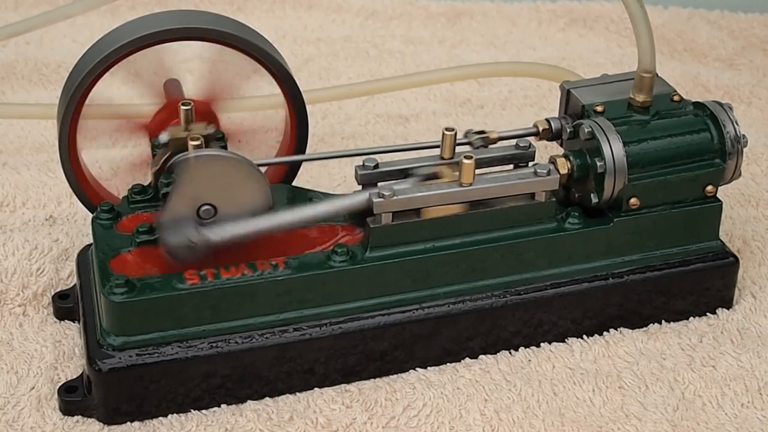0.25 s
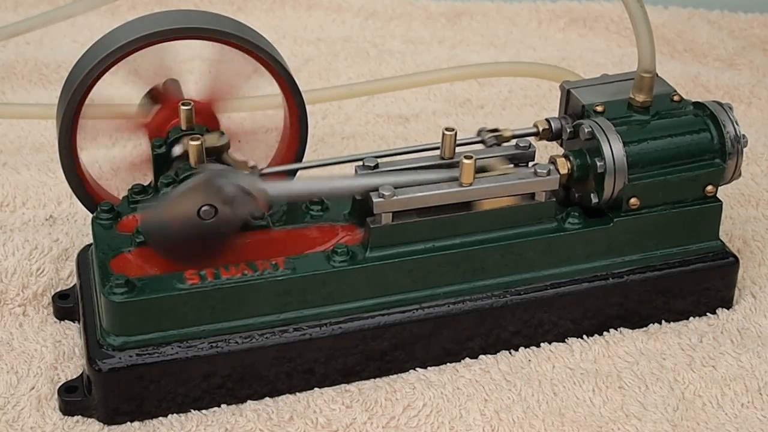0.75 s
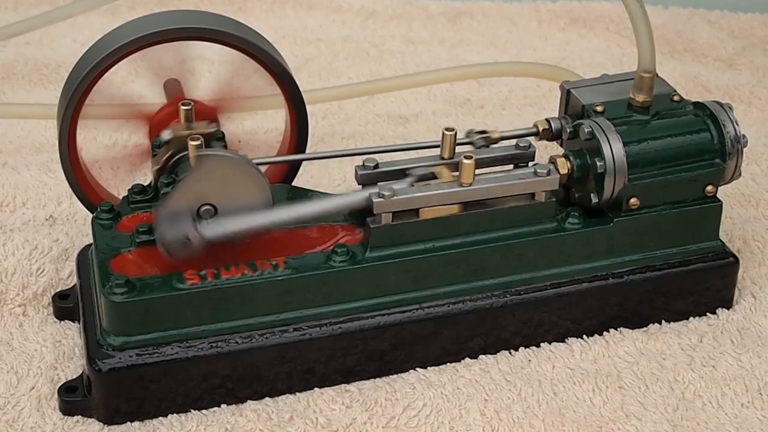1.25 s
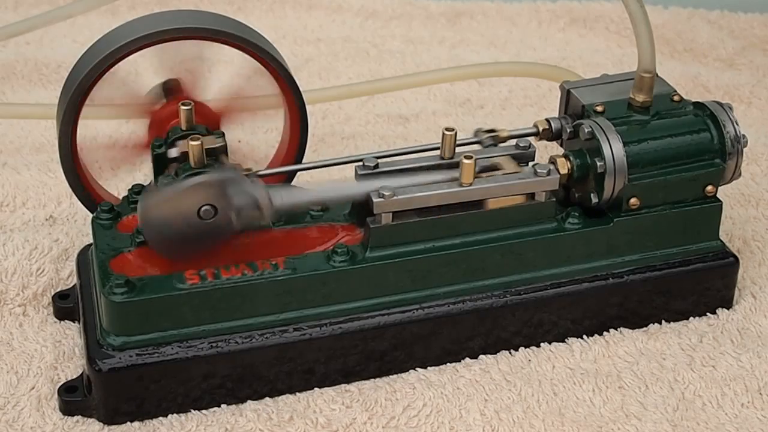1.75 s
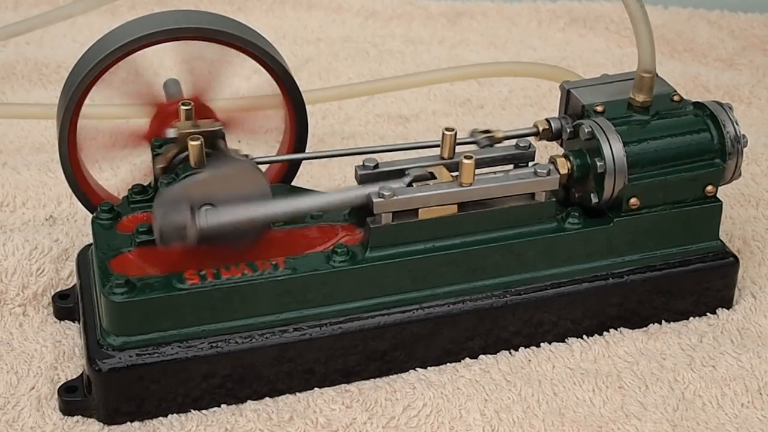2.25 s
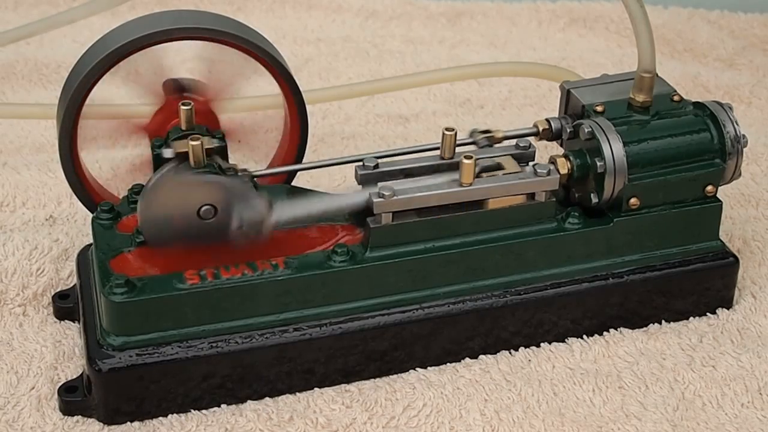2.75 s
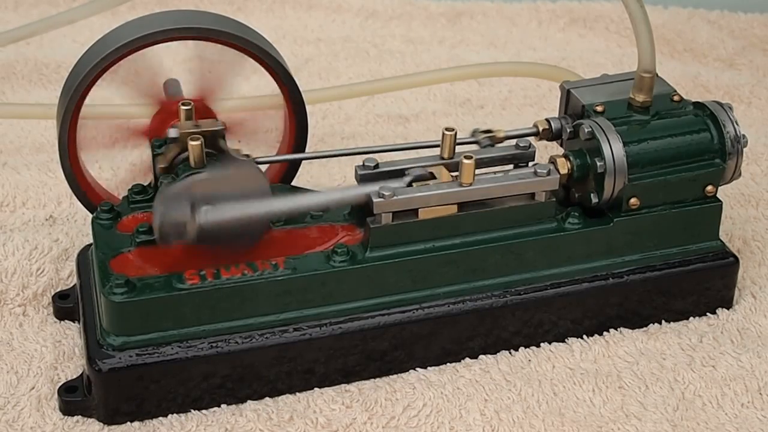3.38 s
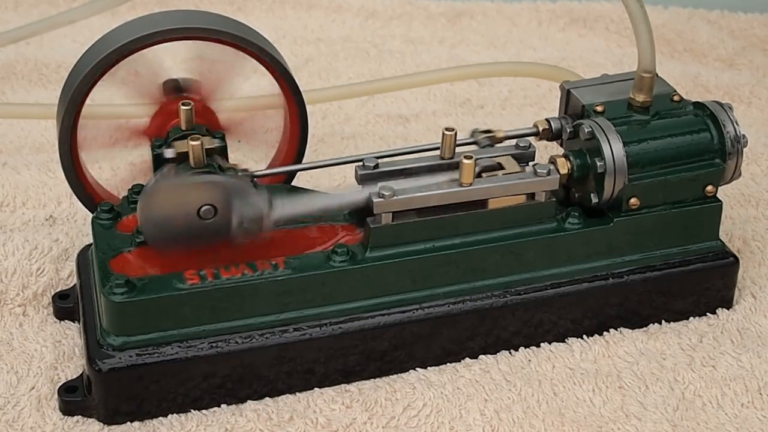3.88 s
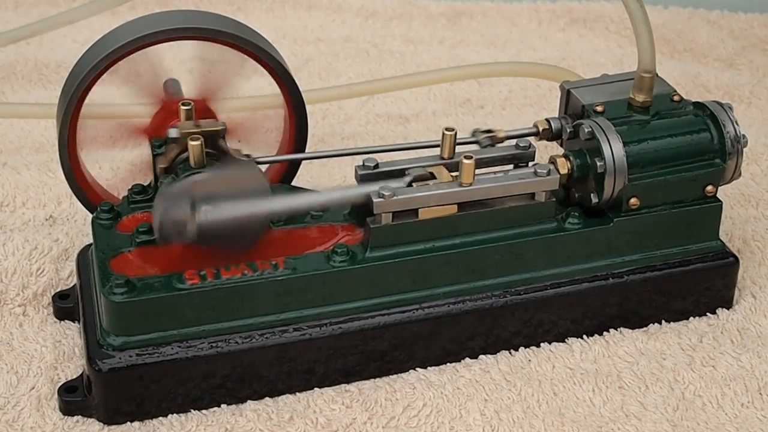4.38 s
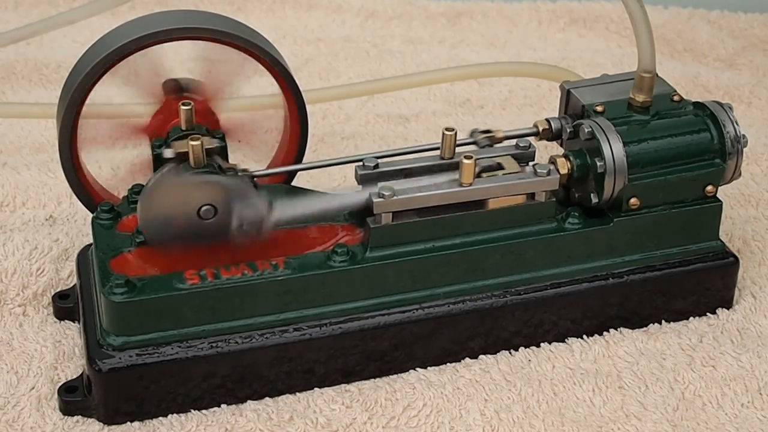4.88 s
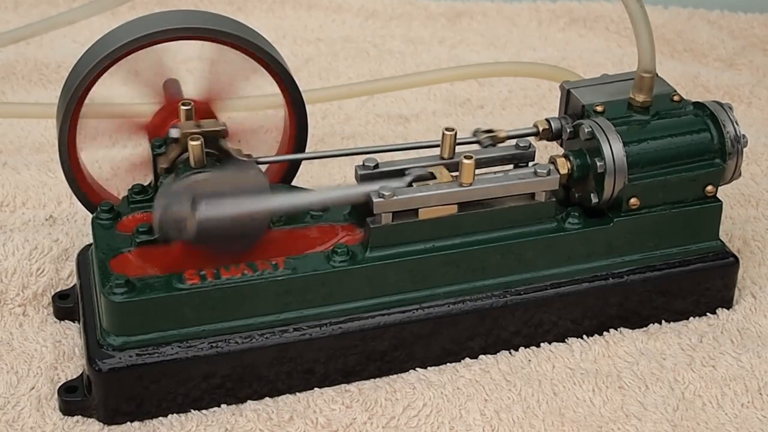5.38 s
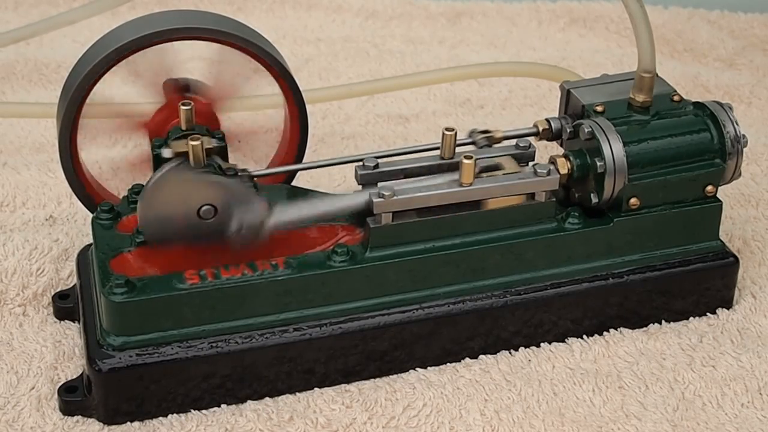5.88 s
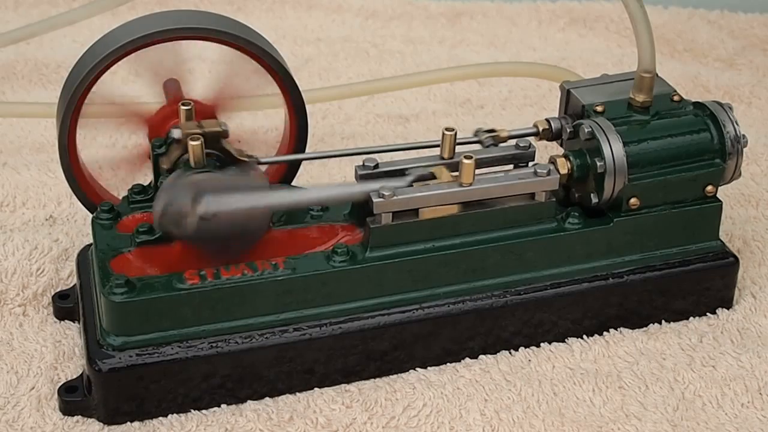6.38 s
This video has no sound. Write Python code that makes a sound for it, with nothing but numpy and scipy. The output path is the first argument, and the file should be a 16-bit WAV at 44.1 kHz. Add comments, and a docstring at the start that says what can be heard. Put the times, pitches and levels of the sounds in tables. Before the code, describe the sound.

A small single-cylinder model steam engine is already running on compressed air and keeps going steadily for about six and a half seconds, at roughly seven turns a second. Each turn makes a tight cluster of bright metallic ticks and a light knock, merging into a quick, even clatter. Underneath, the strokes set the base and table humming with a low, pulsing thrum. Escaping air hisses continuously, with a soft exhaust puff on every turn. Between knocks the valve gives a tiny, very high squeak. These squeaks are barely there at first, become slightly longer and clearer from about 2.7 to 5.3 seconds, then recede near 6 seconds. The clatter and hiss ease very slightly around 3.5 seconds and regain their strength toward the end. The engine sounds close, in a small, dry room with a faint low rumble.

```python
"""In a small, dry room, on a towel-covered table, a model steam engine runs on compressed air.
Its single cylinder drives seven turns a second. In each, the slack rod and valve gear tick and knock,
and the piston's reversals make bed and table boom. Half a turn after the knock, air whistles through the
closing valve gap in a short squeak: the tighter the valve, the longer the squeak and the less air leaks
on the return. Escaping air hisses and puffs over the faint rumble of the room."""
import sys
import numpy as np
from scipy import signal
from scipy.fft import rfft, irfft, next_fast_len
from scipy.io import wavfile
from scipy.ndimage import map_coordinates

SR = 44100
rng = np.random.default_rng(int(sys.argv[2]) if len(sys.argv) > 2 else 0)


def store_pcm(level_fs):
    """Save levels as 16-bit WAV."""
    pcm = np.round(np.clip(level_fs, -1, 1) * 32767).astype(np.int16)
    wavfile.write(sys.argv[1], SR, np.atleast_2d(pcm).T)


N = 292383
SQUEAK_END_S = .0712  # about half a turn after the main knock


def amp(db):
    """Amplitude ratio of a level in decibels."""
    return 10 ** (np.asarray(db) / 20)


def unit(x):
    """Normalisation to rms 1."""
    return x / np.sqrt(np.mean(x ** 2) + 1e-20)


def filtered(x, response):
    """Zero-phase filtering: the spectrum is multiplied by response(f)."""
    size = next_fast_len(N + SR // 2)
    return irfft(rfft(x, size) * response(np.fft.rfftfreq(size, 1 / SR)), size)[:N]


def noise(spectrum):
    """Gaussian noise of rms 1, shaped by points of f/Hz, relative level/dB."""
    hz, db = np.transpose(spectrum)
    colour = lambda f: amp(np.interp(np.log(f + 1), np.log(hz), db))
    return unit(filtered(rng.standard_normal(N), colour))


def wobble(rate):
    """Smooth random modulation: a spline through rate knots a second."""
    return map_coordinates(rng.standard_normal(int(N * rate / SR) + 4), [np.arange(N) * rate / SR])


def impulses(times, sizes):
    """Impulse train: one spike of the given size at each time."""
    at = np.round(times * SR).astype(int)
    inside = (at >= 0) & (at < N)
    return np.bincount(at[inside], sizes[inside], N)


def ring(modes, length_s):
    """Modal superposition: an impulse response of damped sines, alternating in sign."""
    t = np.arange(int(length_s * SR)) / SR
    return sum((-1) ** (k + 1) * amp(db - 60 * t / t60) * np.sin(2 * np.pi * hz * t)
               for k, (hz, db, t60) in enumerate(modes))


def crank(first_knock_s=.0257, effort_scatter_db=0.82, seal_scatter=.05):
    """Rotation is the integral of speed; each whole turn has a knock time, an effort and a valve seal."""
    # crank speed: from t/s, f/Hz
    speed = [(0, 7.003), (.454, 7.052), (1.305, 7.084), (3.281, 7.0145), (5.134, 7.0314)]
    # how hard the air drives the piston: t/s, relative level/dB
    effort_curve = [(0, 1.3), (1.4, 0.1), (2.4, 0.2), (3.4, -1), (4.4, -.5), (5.3, 0), (6.6, 1.5)]
    # how tightly the valve sits on its face: t/s, seal (0-1)
    seal_curve = [(0, 0.22), (.8, 0), (.95, 0.41), (1.5, 0.19), (2.07, .45), (2.5, 0.1), (2.78, .93),
                  (3.06, 1), (3.2, 0.68), (3.49, 0.58), (3.63, 0.96), (3.77, 0.33), (4.3, .75), (5.2, .8),
                  (5.34, 0.4), (5.77, 0.68), (5.91, 0.12), (6.6, .22)]
    t = np.arange(N) / SR
    since, turn_hz = np.transpose(speed)
    turns = np.cumsum(turn_hz[np.searchsorted(since, t, side="right") - 1]) / SR
    knocks = first_knock_s + np.interp(np.arange(np.ceil(turns[-1])), turns, t)
    chance = rng.standard_normal((len(knocks), 2))
    effort_db = np.interp(knocks, *np.transpose(effort_curve)) + effort_scatter_db * chance[:, 0]
    seal = np.interp(knocks + SQUEAK_END_S, *np.transpose(seal_curve)) + seal_scatter * chance[:, 1]
    return knocks, effort_db, np.clip(seal, 0, 1)


def linkage(knocks, effort_db, tap_s=.0773, tap_db=-28.5):
    """Backlash: valve gear ticks, the rod knocks at dead centre, its big end taps at the far reversal."""
    # contacts: t/s after the knock, relative level/dB, T60/s, centre f/Hz, width/octaves
    valve_contacts = [(-.0255, -24.5, 0.016, 2600, .6), (-.0183, -13, 0.014, 4770, 0.75),
                      (-.0168, -8.5, .005, 6370, 0.35), (-.0178, -14.5, 0.018, 11300, 0.071),
                      (-.0152, -23, 0.029, 1100, 2.3)]
    rod_contacts = [(-.0014, -13, 0.02, 4010, 0.67), (.0042, -10, 0.0095, 9800, 0.19),
                    (.004, -19.5, 0.085, 3600, 1), (.0112, -21.5, 0.01, 1600, 0.75),
                    (.0115, -16, 0.017, 10500, 0.35), (-.0007, -13.5, 0.016, 6000, 0.073)]
    # big-end contact: the same columns, t/s after the tap
    tap_contacts = [(0.00025, 5.5, 0.012, 2450, 0.66)]
    valve = impacts(valve_contacts, knocks, 1.6 * effort_db, scatter_db=0.4, rasp_gain=0.63)
    rod = impacts(rod_contacts, knocks, 0.34 * effort_db, scatter_db=1.36, rasp_gain=0.57)
    taps = impacts(tap_contacts, knocks + tap_s, tap_db + 1.9 * effort_db,
                   scatter_db=2.1, rasp_gain=1.0, click_db=19, jitter_s=.0005)
    return valve + rod + taps


def impacts(contacts, times, stroke_db, scatter_db, rasp_gain, click_db=25.5, jitter_s=.00015):
    """Impact excitation: the click and short rasp of each contact set the steel's modes ringing."""
    # modes of the steel parts: f/Hz, relative level/dB, T60/s
    steel_modes = [(2305, -1.5, 0.028), (2700, -4, 0.021), (3237, -2, 0.026), (3720, -2, 0.0069),
                   (4020, -7, 0.0099), (4734, -3, 0.026), (5120, 3, 0.006), (5880, 0, 0.016),
                   (6680, 2.5, 0.0088), (7370, 1, 0.014), (8300, -17, .012), (9300, -25, 0.011),
                   (10480, 1, 0.012), (11100, -2, 0.013), (12100, -1, 0.0057), (13000, -9, .01)]
    t = np.arange(SR // 10) / SR
    rasp, drive = np.zeros(N), np.zeros(N)
    for delay, db, t60, centre_hz, octaves in contacts:
        chance = rng.standard_normal((len(times), 2))
        sizes = amp(db + stroke_db + scatter_db * chance[:, 1])
        hits = impulses(times + delay + jitter_s * chance[:, 0], sizes)
        envelope = signal.fftconvolve(hits, amp(-60 * t / t60))[:N]
        band = lambda f: f / (f + centre_hz / 2) / (1 + (np.log2((f + 1) / centre_hz) / octaves) ** 2)
        rasp += envelope * unit(filtered(rng.standard_normal(N), band))
        drive += 0.49 * envelope * unit(filtered(rng.standard_normal(N), band))
        drive += amp(click_db) * filtered(hits, band)
    steel = ring(steel_modes, length_s=.04)
    ringing = signal.fftconvolve(drive, steel / np.linalg.norm(steel))[:N]
    return rasp_gain * rasp + .55 * ringing


def bed(knocks, effort_db, scatter_db=0.6):
    """Structure-borne sound: the piston's reversals push bed and table, harder with more effort."""
    # pushes: t/s after the knock, relative level/dB, cut-off f/Hz (lower is softer)
    pushes = [(-.017, -10, 3200), (-.0107, 12, 184), (-.0006, 1.04, 1640), (.0039, -1.3, 640),
              (0.011, -13.5, 1430), (0.0573, -4, 315), (0.075, -12, 720)]
    # modes of bed and table: f/Hz, relative level/dB, T60/s
    bed_modes = [(49, -68, 0.35), (86.3, -43, 0.22), (128.2, -44, 0.19), (149.5, -31.5, 0.24),
                 (212.5, -49.5, 0.56), (297.2, -29, 0.16), (382, -29.5, 0.029), (498, -85, .02),
                 (599.4, -26, 0.071), (680, -39.5, 0.15), (757.5, -19, 0.028), (940, -40.5, 0.18)]
    force = np.zeros(N)
    for delay, db, cutoff_hz in pushes:
        sizes = amp(db + 0.89 * effort_db + scatter_db * rng.standard_normal(len(knocks)))
        force += filtered(impulses(knocks + delay, sizes), lambda f: 1 / (1 + (f / cutoff_hz) ** 4))
    return signal.fftconvolve(force, ring(bed_modes, length_s=.5))[:N]


def valve_whistle(knocks, seal, settle_hz=6380, rasp_db=-10, scatter_db=0.6, jitter_s=0.00028):
    """Valve whistle: a brief rasp, then the octave, then the fundamental as the pitch settles."""
    # loose to tight valve: seal (0-1), duration t/s, starting f/Hz, fundamental and octave level/dB
    squeak_by_seal = [(0, .005, 6680, -19.5, -24), (0.398, .0068, 6910, -11, -19.5),
                      (0.748, .009, 5950, -12.5, -14.5), (1, .0118, 4950, -17, -12.8)]
    seals, *columns = np.transpose(squeak_by_seal)
    out = np.zeros(N)
    drift, flutter_db = .035 * wobble(1100), 3.5 * wobble(700)
    rasp = noise([(1000, -13), (3000, -6), (6000, 6), (12000, -1), (16000, -20)])
    for knock, tightness, chance in zip(knocks, seal, rng.standard_normal((len(knocks), 4))):
        length, start_hz, fundamental_db, octave_db = (np.interp(tightness, seals, c) for c in columns)
        end = knock + SQUEAK_END_S + jitter_s * chance[0]
        at = np.arange(int((end - length) * SR), int(end * SR))  # a tighter valve starts it earlier
        if at[-1] >= N:
            continue
        progress = np.linspace(0, 1, len(at))
        start_hz *= 1 + 0.026 * chance[3]
        hz = (start_hz + (settle_hz - start_hz) * progress ** 1.65) * (1 + drift[at])
        phase = 2 * np.pi * np.cumsum(hz) / SR
        swell = np.sqrt(np.abs(np.sin(np.pi * progress))) * amp(flutter_db[at])
        fundamental = amp(fundamental_db + scatter_db * chance[1]) * unit(swell * (progress + 0.15))
        octave = amp(octave_db + scatter_db * chance[2]) * unit(swell * (1 - progress) ** 1.7)
        out[at] += fundamental * np.sin(phase) + octave * np.sin(2 * phase)
        out[at] += amp(octave_db + rasp_db) * unit((1 - progress) ** 2.6) * rasp[at]
    return out


def air_leak(knocks, effort_db, seal, outward_db=-23, seal_db=-3.5, scatter_db=1.5):
    """Turbulent leakage: the hiss follows the effort going out; a tight valve lessens it coming back."""
    # air escaping at valve and glands: f/Hz, relative spectral level/dB
    leak_spectrum = [(150, -12), (1000, -16.5), (1700, -11.5), (2500, -9.5), (3500, -7.5), (4200, -7.5),
                     (5200, -6), (5900, -1), (7100, -1), (8400, -7), (9400, -9), (10800, -5.5),
                     (13500, -10.5), (15500, -12)]
    # leak on the return stroke: t/s, level/dB at mean seal
    return_leak = [(0, -22), (1.7, -22), (2.1, -24.5), (3.3, -24.5), (4.5, -23.5), (5.4, -23), (6, -22.5),
                   (6.6, -21.3)]
    outward = outward_db + effort_db
    back = np.interp(knocks, *np.transpose(return_leak)) + seal_db * (seal - seal.mean())
    back += scatter_db * rng.standard_normal(len(knocks))
    stroke_times = np.ravel(knocks[:, None] + [0, 0.06, 0.075, 0.12])
    stroke_db = np.column_stack([outward, outward, back, back]).ravel()
    level_db = np.interp(np.arange(N) / SR, stroke_times, stroke_db)
    hiss = air_passages(noise(leak_spectrum)) * amp(level_db + 0.79 * wobble(40))
    sputter = unit(amp(0.75 * wobble(900)))  # oil in the gaps
    return hiss * sputter


def air_passages(hiss):
    """Duct resonance: narrow passages lift three bands and weaken one; the result has rms 1."""
    # bands: f/Hz, width/Hz, peak or dip level/dB
    bands = [(2310, 140, -3.5), (4130, 280, 4.5), (6050, 300, 1.5), (8380, 250, 3)]
    gain_db = lambda f: sum(db / (1 + (2 * (f - hz) / width) ** 2) for hz, width, db in bands)
    return unit(filtered(hiss, lambda f: amp(gain_db(f))))


def exhaust(knocks, level_db=-33, lead_s=.004, rise_s=0.00062, t60=0.38):
    """Pressure release: a soft puff of noise starts just before each knock and decays exponentially."""
    # exhaust air: f/Hz, relative spectral level/dB
    puff_spectrum = [(80, 4), (300, 16), (900, 9), (1500, 6), (2500, 14), (5000, -36), (12000, -62)]
    age = np.arange(SR // 4) / SR
    puff_shape = (1 - np.exp(-age / rise_s)) * amp(-60 * age / t60)
    envelope = signal.fftconvolve(impulses(knocks - lead_s, np.ones(len(knocks))), puff_shape)[:N]
    return amp(level_db) * envelope * noise(puff_spectrum)


def room(x, wall_delay_s=.0085, wall_db=-16, tail_db=-13, t60=0.52):
    """Reflection: one near wall and a short diffuse tail add to the direct sound."""
    t = np.arange(SR // 3) / SR
    tail = rng.standard_normal(len(t)) * amp(-60 * t / t60) * (t > wall_delay_s)
    response = amp(tail_db) * tail / np.linalg.norm(tail)
    response[int(wall_delay_s * SR)] += amp(wall_db)
    return x + signal.fftconvolve(x, response)[:N]


def background(rumble_db=-46):
    """Ambient noise: a faint broad rumble, and a narrow-band drone near 48 Hz that comes and goes."""
    # swell of the drone: t/s, level/dB
    drone_curve = [(0, -66), (1.45, -58), (1.9, -48), (2.199, -57), (3.2, -49), (4.1, -59), (5.3, -58),
                   (6.6, -75)]
    # room rumble: f/Hz, relative spectral level/dB
    rumble_spectrum = [(12, -12), (22, -6), (30, -16), (65, -12), (150, 2.5), (500, -15), (2000, -30)]
    drone_db = np.interp(np.arange(N) / SR, *np.transpose(drone_curve))
    drone = amp(drone_db) * noise([(30, -40), (41, -8), (48, 0), (53, -12), (75, -40), (300, -90)])
    return drone + amp(rumble_db) * noise(rumble_spectrum)


def scene():
    """Superposition: the engine's sources, all timed by the crank, add to the room's background."""
    knocks, effort_db, seal = crank()
    treble = linkage(knocks, effort_db) + valve_whistle(knocks, seal)
    machine = bed(knocks, effort_db) + room(treble)
    air = air_leak(knocks, effort_db, seal) + exhaust(knocks)
    return (machine + air + background())[None]


def record(dry, ceiling=.92, notch_hz=7870, notch_width_hz=170, top_hz=15770):
    """Soft saturation rounds the tallest peaks; a narrow notch and a steep low-pass shape the treble."""
    rounded = dry[0] / (1 + np.abs(dry[0] / ceiling) ** 6) ** (1 / 6)
    notch = lambda f: np.abs(f - notch_hz) / np.hypot(f - notch_hz, notch_width_hz)
    low_pass = lambda f: 1 / (1 + np.exp(np.clip((f - top_hz) / 30, -50, 50)))
    return filtered(rounded, lambda f: notch(f) * low_pass(f))[None]


dry = scene()
out = record(dry)
store_pcm(out)
```